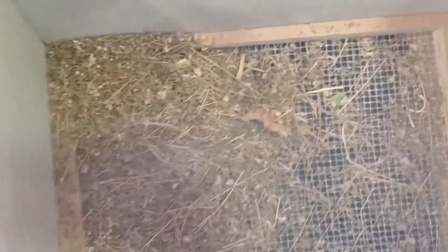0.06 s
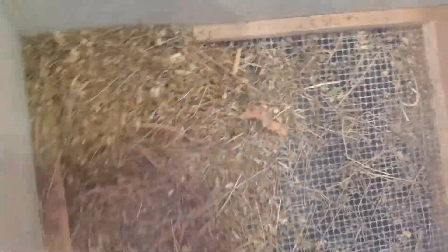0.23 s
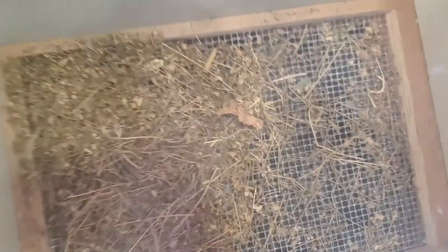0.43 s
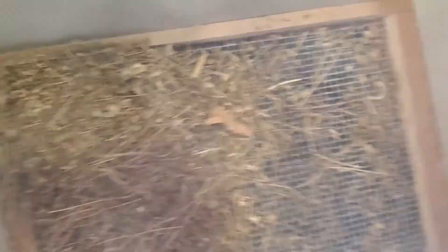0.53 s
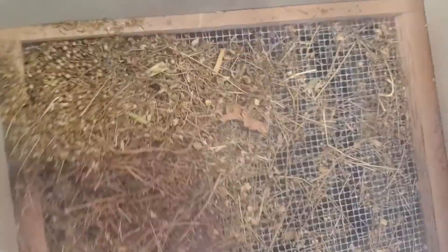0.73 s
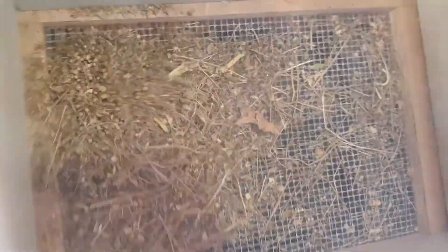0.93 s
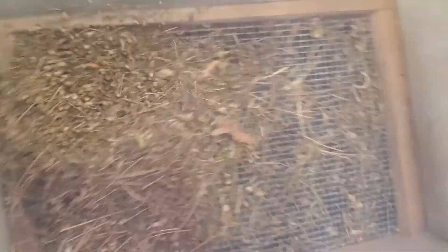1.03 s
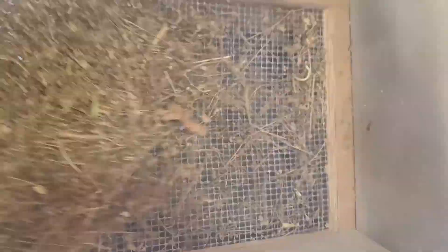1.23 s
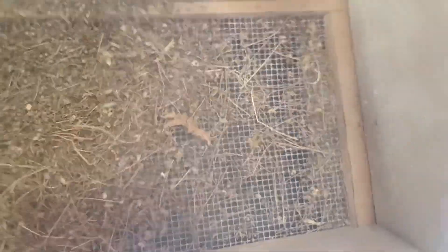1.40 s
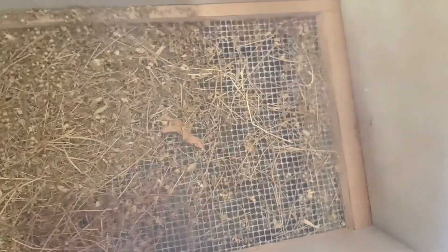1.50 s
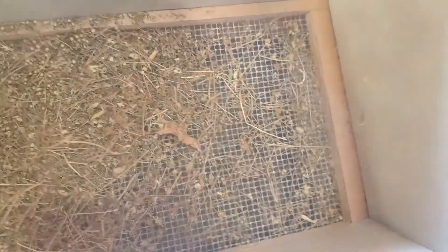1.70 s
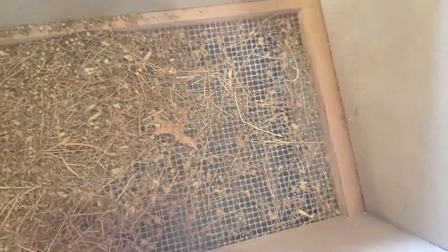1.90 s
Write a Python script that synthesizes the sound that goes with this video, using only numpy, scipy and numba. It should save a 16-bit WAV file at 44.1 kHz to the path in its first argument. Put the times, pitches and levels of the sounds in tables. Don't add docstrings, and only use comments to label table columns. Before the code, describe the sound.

Close phone pickup of a hand-shaken wooden screen: irregular hollow knocks and loose frame clatter, short swishes of dry seed after strokes, hardest around one second, then near quiet with a few crisp snaps.

```python
import sys
import numpy as np
from scipy import signal
from scipy.fft import rfft, irfft
from scipy.io import wavfile
from scipy.ndimage import uniform_filter1d
from numba import njit

SR = 44100
rng = np.random.default_rng(int(sys.argv[2]) if len(sys.argv) > 2 else 0)


def boost(x):
    u = np.asarray(x, float) / 20
    return 10 ** u


def inscribe(sig):
    pcm = np.round(np.clip(np.atleast_2d(sig).T, -1, 1) * 32767)
    wavfile.write(sys.argv[1], SR, pcm.astype(np.int16))


N = 85995

# (frequency [Hz], level [dB], t60 [s])
WOOD_MODES = [(141, 0.5, 0.07), (159, 1.5, 0.049), (496, -12, 0.013), (1163, -9.5, 0.027), (171.2, 1, 0.13),
              (215.8, 1, 0.083), (307, -4.5, 0.067), (426, -11, 0.032), (561, -12, 0.054),
              (666, -8.5, 0.032), (900, -2, 0.029), (1030, -11, 0.0058), (1518, -1.5, 0.023),
              (2130, -0.5, 0.017)]
# (frequency [Hz], level [dB], t60 [s])
BIN_MODES = [(54, -3, .2), (64, -2, .15), (80, 0, .2), (101, -3, .12)]
# (frequency [Hz], level [dB])
SCRAPE_BANDS = [(150, 1.5), (500, 2), (1200, 2), (3000, -7), (7000, -19.5), (16000, -67)]


@njit
def ring(x, hz, t60_s):
    y, z = np.empty(len(x)), 0j
    pole = np.exp(2j * np.pi * hz / SR - np.log(1000.) / (t60_s * SR))
    for i in range(len(x)):
        z = z * pole + x[i]
        y[i] = z.imag
    return y


def unit(x):
    return x / np.sqrt(np.mean(x ** 2))


def shape(x, points):
    hz, db = np.array(points, float).T
    n = x.shape[-1]
    f = np.maximum(np.fft.rfftfreq(n, 1 / SR), 1)
    return irfft(rfft(x) * boost(np.interp(np.log(f), np.log(hz), db)), n)


def walk(rate_hz):
    k = int(SR / rate_hz)
    steps = np.repeat(rng.standard_normal(N // k + 1), k)
    return unit(uniform_filter1d(uniform_filter1d(steps, k), k)[:N])


def clicks(per_s, spread_db):
    u = rng.random((3, N))
    hit = u[0] < per_s / SR
    size = boost(-spread_db * np.log(u[2] + 1e-9))
    return unit(hit * np.sign(u[1] - .5) * size)


def burst(t, at_s, tau_s):
    return (t >= at_s) * np.exp(-np.maximum(t - at_s, 0) / tau_s)


def soften(x, ms):
    p = np.exp(-1000 / (max(ms, .02) * SR))
    return signal.lfilter([1 - p], [1, -p], x)


def body(x, modes, chance=None):
    scatter_db, detune = 2.5, 0.033
    chance = np.zeros((len(modes), 2)) if chance is None else chance
    out = 0
    for k, ((hz, db, t60_s), c) in enumerate(zip(modes, chance)):
        mode = ring(x, hz * (1 + detune * c[1]), t60_s + 0.00097)
        out = out + (-1) ** k * boost(db + scatter_db * c[0]) * mode
    return out


def diffuse(x, lags, t60_s):
    for lag in lags:
        b = np.zeros(lag + 1)
        b[0], b[-1] = -min(boost(-60 * lag / SR / t60_s), .7), 1
        x = signal.lfilter(b, b[::-1], x)
    return x


def knocks():
    # (time [s], level [dB], boom of bin [dB], crack of wood [dB], contact [ms])
    blows = [(.037,-30,1,-14,0.32),(0.074,-46,6,-30,2.1),(0.165,-24,4,-26,1.8),(.194,-20.5,-1.5,-8.5,1.14),(0.367,-20.5,0.5,-1,0.25),(.444,-22.5,3,-9.5,0.46),(0.479,-27.5,8.5,-33,3.1),(.521,-16.5,-1,-37,1.2),(0.557,-10.5,4.5,-17,0.31),(0.584,-22,8.5,-23,3.3),(.676,-22,8.5,-21,0.98),(0.749,-16.5,0,-39,0.32),(.793,-9.5,2.5,-39,0.29),(.821,-11,-4.5,-11.5,0.62),(.923,-17,-1,-17,0.3),(1.0136,-5.5,-1.5,-7.5,0.3),(1.048,-12.5,-8,-31,0.22),(1.056,-10.5,6,-34,0.34),(1.075,-12,-1.5,-14,3.2),(1.151,-18.5,-1,-28,1.3),(1.294,-31,4.5,-36,0.26),(1.3287,-16.5,3.5,8,0.71),(1.342,-19,-18,-17,0.19),(1.421,-14.5,0,-1.5,2.8)]
    # (frequency [Hz], level [dB])
    crack_bands = [(300, -30), (900, -7), (1600, 6), (3500, -1), (5200, -8.5), (7500, -11), (16000, -42)]
    knock_db, boom_gain_db, crack_gain_db, splinter_db, rattle_db = 1, -1, 3, -14.5, -12
    crack_s, splinter_s, rattle_s = 0.0027, 0.016, 0.016
    out, n = np.zeros(N), int(.4 * SR)
    chance = rng.standard_normal((len(blows), len(WOOD_MODES) + len(BIN_MODES), 2))
    loose = clicks(500, 2.3)
    hiss = unit(shape(rng.standard_normal(N), crack_bands))
    splinters = unit(shape(clicks(2500, 2.4), SCRAPE_BANDS))
    for (at_s, db, boom_db, crack_db, ms), c in zip(blows, chance):
        i = int(at_s * SR)
        m = min(n, N - i)
        t = np.arange(m) / SR
        blow = boost(rattle_db) * loose[i:i + m] / 9 * np.exp(-t / rattle_s)
        blow[0] = 1
        wood = body(soften(soften(blow, ms), ms / 3), WOOD_MODES, c)
        boom = body(soften(blow, 2.4), BIN_MODES, c[len(WOOD_MODES):])
        crack = hiss[i:i + m] * np.exp(-t / crack_s) * (1 - np.exp(-t * 1000 / ms))
        bits = (0.37 / max(ms, .2)) ** 2 * splinters[i:i + m] * np.exp(-t / splinter_s)
        mix = boost(knock_db) * wood / np.abs(wood).max()
        mix += boost(boom_gain_db + boom_db) * boom / np.abs(boom).max()
        mix += boost(crack_gain_db + crack_db) * crack + boost(splinter_db) * bits
        out[i:i + m] += boost(db) * mix
    return out


def clatter():
    # (time [s], level [dB], ring [Hz], t60 [s])
    joints = [(0.039,-54,446,0.045),(.187,-33,704,0.044),(.3,-50,346,0.031),(0.309,-31,900,.04),(0.3668,-2.5,170,0.04),(.367,-10,900,0.014),
              (.45,-26,550,0.033),(.5582,-5,410,0.021),(.56,-14.5,631,0.033),(0.5636,-4.5,163,0.08),(.747,-18.5,830,0.043),(.75,-29,200,0.12),
              (0.766,-20.5,1020,0.017),(.772,-25,780,0.035),(.794,-17.5,800,0.079),(.8,-16,910,0.026),(.807,-33,730,0.025),(.82,-10,291,0.053),
              (0.829,-19,1150,0.018),(0.833,-24,330,0.027),(.872,-32,550,0.1),(.926,-29,248,0.028),(1.0141,-11.5,147,0.082),(1.044,-16,167,0.036),
              (1.045,-15,706,0.04),(1.048,-15,1014,.03),(1.054,-8.5,344,0.054),(1.058,-6.5,620,0.024),(1.065,-22,332,0.054),(1.067,-22,900,0.017),
              (1.073,-16,650,0.032),(1.079,-18,692,0.028),(1.091,-30,195,0.036),(1.122,-22,475,0.029),(1.126,-29,1110,0.033),(1.149,-24,1240,0.056),
              (1.0142,-15,900,.025),(1.293,-29,346,0.071),(1.329,-9.5,223,0.038),(1.338,-13.5,900,0.038),(1.341,-15.5,247,0.053),(1.346,-17.5,583,0.091),
              (1.425,-20,275,0.064),(1.439,-35,240,0.11)]
    rise_cycles, upper_ratio, upper_db, max_cycles = 0.35, 1.1, -5, 26
    out, t = np.zeros(N), np.arange(int(.15 * SR)) / SR
    for at_s, db, hz, t60_s in joints:
        i = int(at_s * SR)
        fall_db = -60 * t / min(t60_s, max_cycles / hz)
        lower = np.sin(2 * np.pi * hz * t)
        upper = boost(upper_db + fall_db) * np.sin(2 * np.pi * upper_ratio * hz * t)
        rise = 1 - np.exp(-t * hz / rise_cycles)
        out[i:i + len(t)] -= boost(db + fall_db) * rise * (lower + upper)
    return out


def drag(t):
    # (time [s], drag level [dB])
    effort = [(0,-30),(.1,-59),(.15,-42),(.19,-25),(.25,-50),(.33,-23.5),(.5,-29.5),(.65,-32.5),(.72,-37.5),(.83,-20.5),(.94,-26),(.99,-35),(1.06,-26.5),(1.2,-24.5),(1.31,-54),(1.44,-22.5),(1.52,-62),(1.95,-44.5)]
    # (time [s], scrape level [dB])
    slide = [(0,-42.5),(.1,-81),(.16,-50),(.2,-43.5),(.26,-51),(.34,-36),(.42,-44.5),(.5,-44.5),(.65,-42.5),(.76,-37),(.86,-38),(.94,-37.5),(.99,-60),(1.06,-30.5),(1.2,-42.5),(1.31,-53),(1.44,-31),(1.52,-96)]
    wood_db, boom_db = -9, -3
    slip = soften(clicks(1500, 2.5), 0.17)
    stutter_db = 2.5 * walk(40)
    gain = boost(np.interp(t, *np.array(effort).T) + stutter_db)
    grit = unit(shape(clicks(3000, 2.8), SCRAPE_BANDS))
    out = boost(np.interp(t, *np.array(slide).T) + stutter_db) * grit
    for db, modes in [(wood_db, WOOD_MODES), (boom_db, BIN_MODES)]:
        steady_rms = np.sqrt(np.mean(body(slip, modes) ** 2))
        out += boost(db) * body(slip * gain, modes) / steady_rms
    return out


def seed(t):
    # (peak time [s], level [dB], rise [s], fall [s])
    rushes = [
        (0.194, -50, 0.024, 0.037),
        (0.379, -31, 0.012, 0.027),
        (0.567, -31.5, 0.015, 0.013),
        (.618, -22.5, 0.013, 0.011),
        (0.807, -31.5, 0.0039, 0.0085),
        (0.872, -22, 0.021, 0.016),
        (1.062, -31, 0.025, 0.067),
        (1.113, -24.5, 0.013, 0.01),
        (1.381, -24, 0.028, 0.015),
        (1.429, -41.5, 0.018, 0.047),
    ]
    # (time [s], level [dB])
    trickle_levels = [(0,-51),(.08,-55.5),(.16,-61.5),(.3,-53.5),(.43,-48.5),(.53,-47.5),(.7,-53),(.76,-46),(.93,-44.5),(.99,-49.5),(1.17,-46),(1.3,-41.5),(1.47,-50.5),(1.54,-53.5),(1.6,-51),(1.78,-55),(1.8,-63.5),(1.95,-67)]
    # (frequency [Hz], level [dB])
    grain_bands = [(530, -43), (900, -6), (1490, 4.5), (2230, 1), (3480, 6), (5290, 1), (6800, 4),
                   (7480, 2), (15700, -14)]
    trickle_gain_db, tilt_db = 2, 2
    trickle = boost(trickle_gain_db + np.interp(t, *np.array(trickle_levels).T) + 2.0 * walk(30.2))
    rush = np.zeros(N)
    for at_s, db, rise_s, fall_s in rushes:
        rush += boost(db) / np.cosh((t - at_s) / np.where(t < at_s, rise_s, fall_s) * 1.396)
    ports = []
    for _ in range(2):
        grains = unit(shape(clicks(9000, 2), [(300, -10), *grain_bands]))
        fine = shape(grains[::-1], [(2000, 0), (14000, tilt_db)])
        ports.append(grains * rush + fine * trickle)
    return np.array(ports)


def ticks(t):
    # (time [s], level [dB], ring [Hz], t60 [s], snap over ring [dB])
    tick_list = [(.037,-32.5,900,0.018,2),(.2548,-47,12200,.006,-4),(0.354,-25,900,0.014,1),(1.566,-38,11200,0.0058,-2),(1.586,-55,2920,.012,-6),(1.617,-42.5,2380,0.0094,10),(1.644,-44,3800,0.0067,10),(1.6505,-31.5,2200,0.014,0),(1.666,-45,5000,0.008,2),(1.735,-35.5,2400,0.015,-2),(1.737,-32.5,414,0.025,-18),(1.743,-32,1430,0.028,-1),(1.766,-20.5,1426,0.03,1.5),(1.778,-33,1300,0.02,-3),(1.3307,-10.5,3300,0.009,1),(1.896,-46.5,14300,0.0032,-2),(1.924,-33.5,3200,0.018,1.5)]
    # (frequency [Hz], level [dB])
    snap_bands = [(500, -6), (1200, 6), (3000, 7.5), (6500, 6), (8000, -1.5), (16000, -15)]
    gain_db, hiss_s, rise_s, max_t60_s = 2.5, 0.0027, 0.00084, 0.022
    out, hiss = np.zeros(N), rng.standard_normal(N)
    for at_s, db, hz, t60_s, snap_db in tick_list:
        envelope = burst(t, at_s, hiss_s) - burst(t, at_s, rise_s) + 0.11 * burst(t, at_s, 4 * hiss_s)
        snap = soften(shape(hiss * envelope, snap_bands), 60 / hz)
        twang = ring(hiss * burst(t, at_s, .5 / hz), 1. * hz, min(t60_s, max_t60_s))
        out += boost(db + gain_db) * (twang / np.abs(twang).max() + boost(snap_db) * snap)
    return out


def bin_echo(x):
    lags = rng.integers(60, 330, size=(2, 5))
    tails = np.array([diffuse(x, port_lags, 0.12) for port_lags in lags])
    return shape(tails, [(40, -14), (150, -8), (600, 1.5), (2600, 0), (16000, -10)])


def shadowed(x):
    shadow_hz, scatter_t60_s, scatter_db = 1300, 0.02, -1.5
    scattered = diffuse(x, rng.integers(7, 60, size=4), scatter_t60_s)
    scattered = shape(scattered, [(shadow_hz / 4, -24), (shadow_hz, scatter_db)])
    return shape(x, [(shadow_hz / 3, 0), (shadow_hz * 2, -8)]) + scattered


def farm():
    # (frequency [Hz], level [dB])
    air_bands = [(18, -37), (30, 4), (75, -1), (199, -11), (394, -24), (1430, -29.5), (7500, -43),
                 (16000, -43.5)]
    air = np.array([unit(shape(rng.standard_normal(N), air_bands)) for _ in range(2)])
    return air * boost(-43 + 0.5 * walk(4.2))


def scene():
    # (frequency [Hz], level [dB])
    port_tilt = [(60, 2.6), (200, 4.4), (700, 4.5), (2380, 3.5), (4400, 1.5), (9500, 0), (11500, 8),
                 (15000, 24)]
    apart_hz, echo_db, far_tick_db = 900, -13, -4
    far_lag, far_tick_lag = 10, 8
    t = np.arange(N) / SR
    hard = knocks() + drag(t) + clatter()
    stems = ticks(t)
    one, other = seed(t) + farm()
    common = shape(one, [(apart_hz / 3, 0), (apart_hz * 2, 10 * np.log10(0.0012))])
    separate = shape(other, [(apart_hz / 8, -30), (apart_hz * 2, 0)])
    left = hard + stems + one
    right = shadowed(hard + boost(far_tick_db) * np.roll(stems, far_tick_lag)) + common + separate
    left, right = np.array([left, right]) + boost(echo_db) * bin_echo(hard + stems / 2)
    right = np.roll(right, far_lag)
    left = shape(left, [(hz, db / 2) for hz, db in port_tilt])
    right = shape(right, [(hz, -db / 2) for hz, db in port_tilt])
    return np.array([left, right])


def top_cut(x):
    return signal.sosfilt(signal.butter(12, 16820, fs=SR, output="sos"), x)


def record(dry):
    # (frequency [Hz], gain [dB])
    mic_notch = [(6600, 0.5), (7700, -5), (8900, 1.5), (10500, 5.5)]
    x = shape(dry, mic_notch)
    x = signal.sosfilt(signal.butter(3, 44, "high", fs=SR, output="sos"), x)
    x = np.tanh(.8 * x) / .8
    x = signal.sosfilt(signal.ellip(8, .2, 70, 15650, fs=SR, output="sos"), x)
    return top_cut(x)


dry = scene()
out = record(dry)
inscribe(out)
```